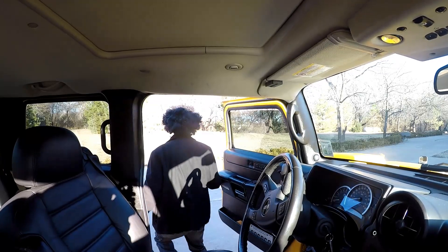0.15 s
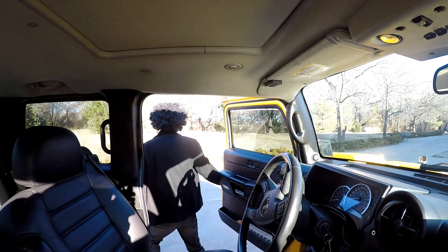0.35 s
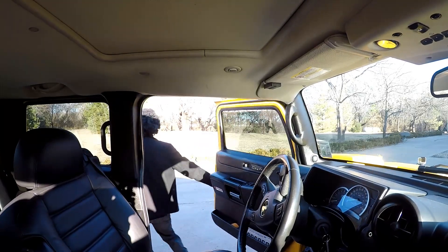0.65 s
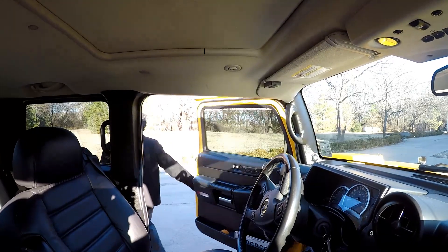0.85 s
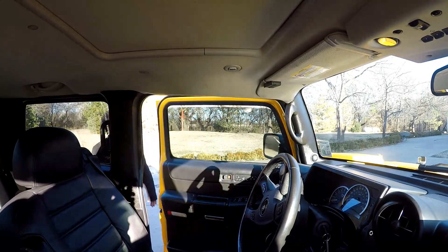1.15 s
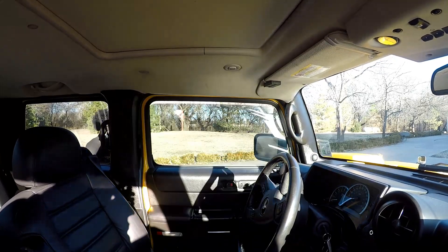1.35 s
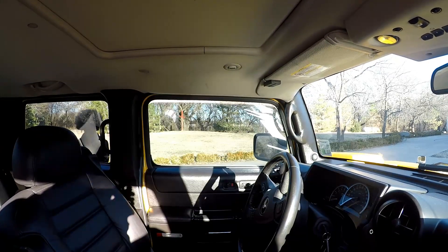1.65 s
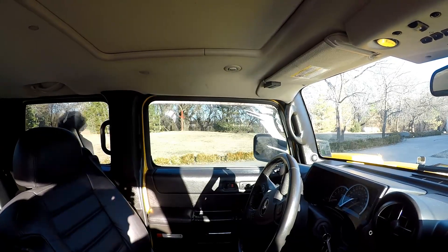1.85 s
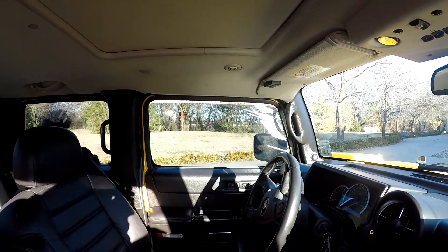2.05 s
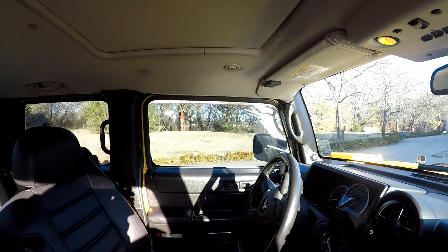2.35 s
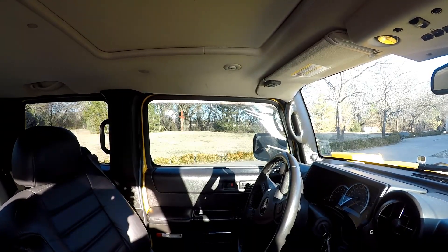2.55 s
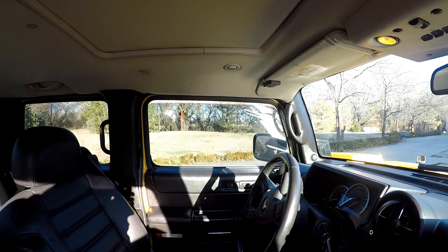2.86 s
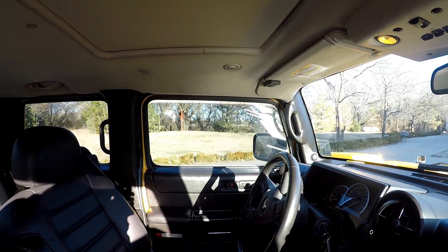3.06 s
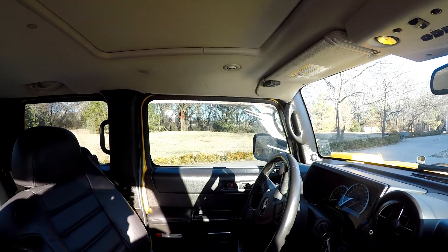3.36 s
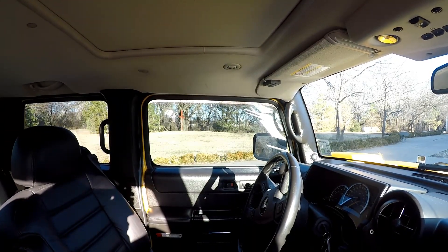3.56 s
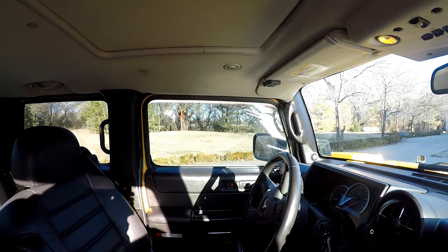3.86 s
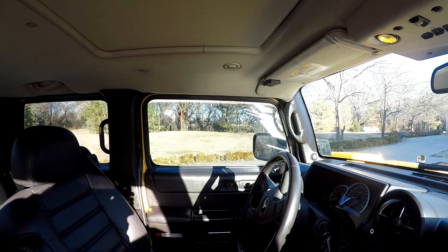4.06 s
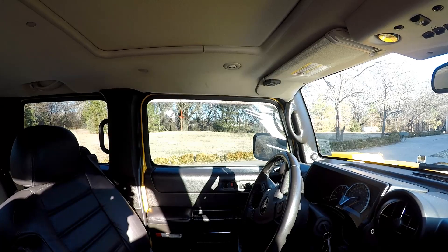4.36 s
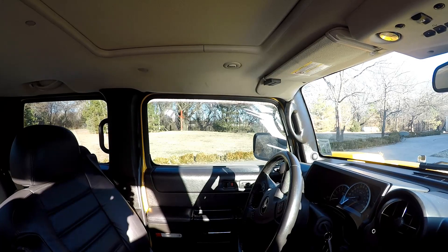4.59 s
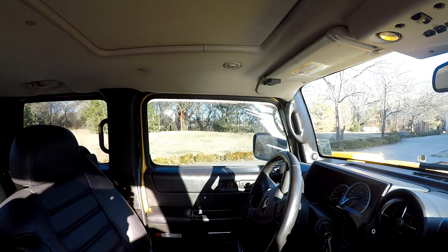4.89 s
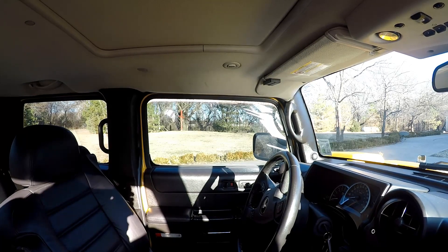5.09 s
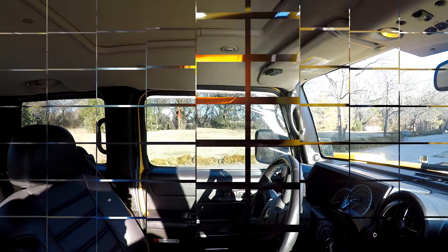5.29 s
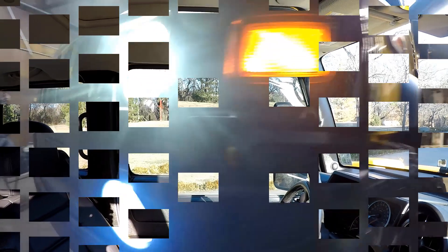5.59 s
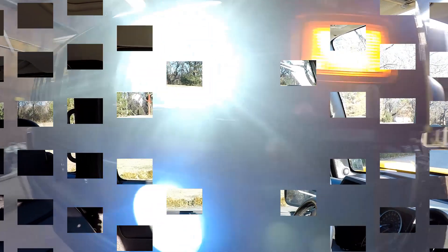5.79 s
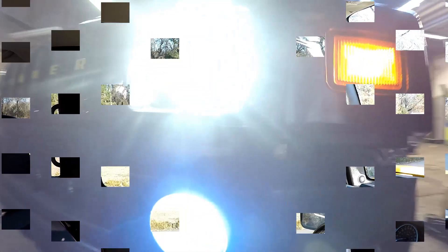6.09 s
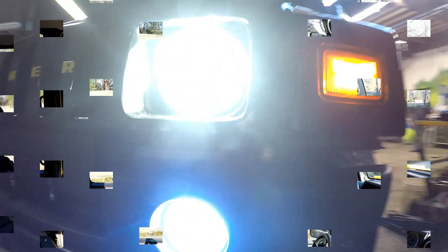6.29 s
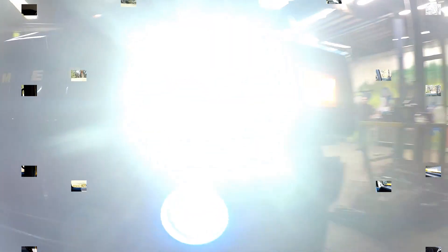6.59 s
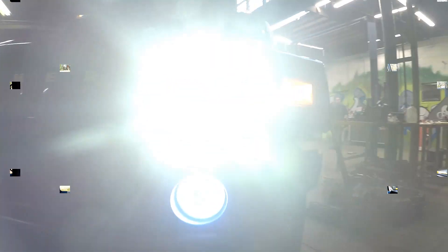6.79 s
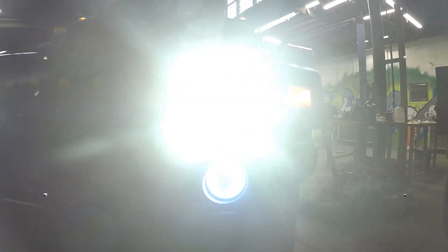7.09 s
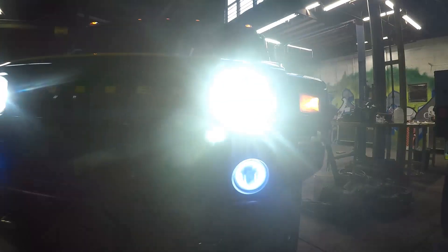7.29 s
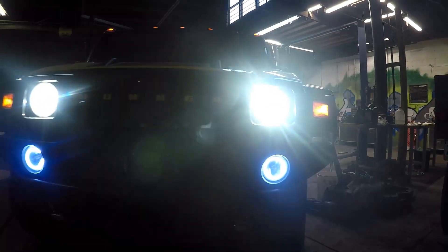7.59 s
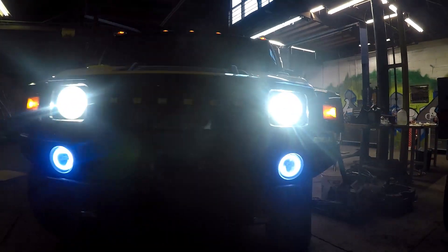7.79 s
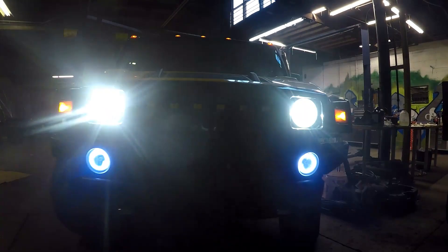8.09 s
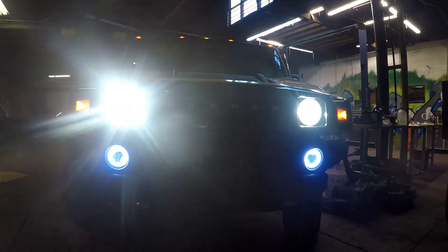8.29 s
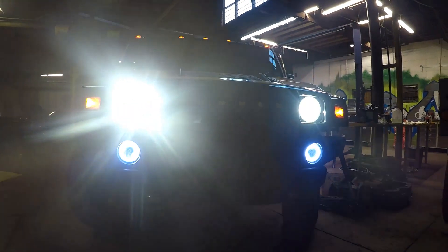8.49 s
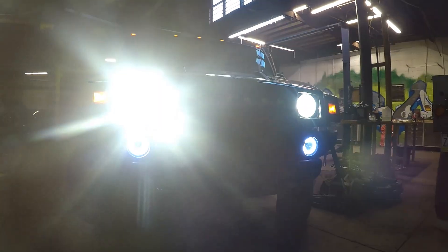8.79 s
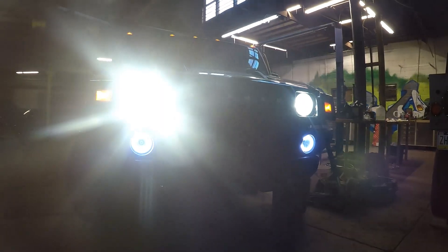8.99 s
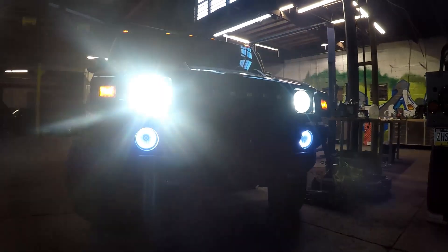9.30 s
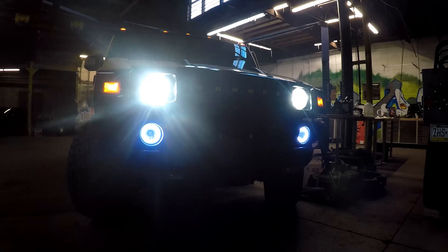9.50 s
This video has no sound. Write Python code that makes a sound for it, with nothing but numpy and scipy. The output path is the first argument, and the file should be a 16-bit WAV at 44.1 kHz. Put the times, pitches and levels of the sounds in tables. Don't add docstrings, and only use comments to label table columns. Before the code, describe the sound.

Boxy, slightly muffled sound from a microphone in a closed housing. From 0 s, a parked cab with its door open: low wind buffeting, faint cloth rustle, a sharp trim click and dull knock at about 0.15 s, and smaller ticks and a soft bump near 1.05 s. At 1.52 s the door seal brushes, then latch and heavy slam land by 1.6 s, with rattling rebounds until 1.75 s, a low panel ring and slow sub-bass air pulse. The level then ducks sharply; quiet wind and hiss creep back, with a gust near 3.95 s and a soft low thud at 4.83 s. From 6.3 to 7.6 s it crossfades to a reverberant workshop: a large diesel idling steadily, about 46 firings per second, with deep hum, exhaust rumble and metallic clatter. Two small clicks come near 7.4 s. While walking past, the deep hum weakens and its octave strengthens by 8.6 s, continuing to the end.

```python
import sys
import numpy as np
from scipy import signal
from scipy.fft import rfft, irfft, next_fast_len
from scipy.io import wavfile

SR = 44100
rng = np.random.default_rng(int(sys.argv[2]) if len(sys.argv) > 2 else 0)


def voltage_ratio(decibels):
    exponent = np.asarray(decibels, float) / 20
    return 10 ** exponent


def dump_mix(stems):
    frames = np.atleast_2d(stems).T
    limited = np.clip(frames, -1, 1)
    pcm = np.round(limited * 32767).astype(np.int16)
    wavfile.write(sys.argv[1], SR, pcm)


N = 425565
HISS_DB = -67


# time in seconds, place (0 firing tone peaks, 1 its octave peaks).
WALK = [(6.4, 1.2), (6.55, 1), (6.75, .15), (6.9, 0), (7.45, .25), (7.9, .7), (8.2, .87), (8.6, 1),
        (9.65, 1)]
# time in seconds, firings per second.
IDLE_SPEED = [(6.3, 46.45), (7.65, 46.5), (7.85, 45.95), (8.3, 45.8), (8.7, 45.55), (9.65, 45.55)]


def engine():
    place, = in_time(WALK)
    tone_db = -15 - 10.5 * place ** 3
    octave_db = -25 + 11.5 * place
    rumble_db = -21.5 - 2 * place + 2.5 * np.sin(np.pi * place)
    clatter_db = -28
    firings = np.cumsum(in_time(IDLE_SPEED)[0]) / SR
    strength = firing_strength(firings)
    layers = np.sqrt(2) * crank_tones(firings, tone_db, octave_db, clatter_db)
    layers += voltage_ratio(rumble_db + 3.5) * exhaust_rumble(firings, strength)
    layers += voltage_ratio(clatter_db + 1.5) * block_clatter(firings, strength)
    return layers * crossfade()


CYLINDER_DB = [1.2, -.9, .6, -1.1, .9, -1.2, .5, -.3]


def firing_strength(firings):
    number, phase = firings.astype(int), firings % 1
    chance_db = 0.13 * rng.standard_normal(number[-1] + 1)
    return voltage_ratio(np.array(CYLINDER_DB)[number % 8] + chance_db[number]) * np.clip(phase * 9, 0, 1)


# frequency in Hz, width in Hz, gain in dB.
BLOCK_MODES = [(926, 45, 5.5), (1420, 600, 2), (2132, 410, 6.5), (2713, 340, 7), (4800, 500, 6.5)]
# frequency in Hz, density in dB per Hz.
CLATTER_SPECTRUM = [(280, -24), (480, -5.5), (539, -9.5), (950, -15), (1130, -8), (1580, -1.5),
                    (2370, -12.5), (2700, -13), (3560, -8), (4760, -19), (6100, -22), (7800, -37),
                    (12800, -52.5), (15400, -53.5)]


def block_clatter(firings, strength):
    knock = strength * np.exp(-(firings % 1) * 3.6) + 0.54
    knocks = knock * cycle_locked(firings, lasting_s=0.6, share=0.3)
    knocks = uneven_parts(knocks, firings.astype(int), spread_db=1.4)
    return colour(peaks(workshop(knocks, t60=1.0, wet_db=-1.5), BLOCK_MODES), CLATTER_SPECTRUM)


# low edge in Hz, top edge in Hz.
BLOCK_PARTS_HZ = [(300, 1250), (1250, 2250), (2250, 3600), (3600, 16000)]


def uneven_parts(x, number, spread_db):
    draws = voltage_ratio(spread_db * rng.standard_normal((number[-1] + 1, len(BLOCK_PARTS_HZ))))
    out = np.zeros(N)
    for k, edges in enumerate(BLOCK_PARTS_HZ):
        band = signal.butter(2, edges, "band", fs=SR, output="sos")
        out += signal.sosfilt(band, x * draws[number, k])
    return out


# frequency in Hz, density in dB per Hz.
RUMBLE_SPECTRUM = [(3, -14.5), (12, -15), (28, -22), (45, -10), (65, 3.5), (78, -1.5), (105, -0.5),
                   (125, -3), (150, -2), (195, -5), (250, -10), (320, -13.5), (400, -17), (520, -40),
                   (700, -57)]


def exhaust_rumble(firings, strength):
    exhaust = cycle_locked(firings, lasting_s=0.7, share=0.65) * voltage_ratio(0.8 * drift(8))
    exhaust *= strength * np.exp(-(firings % 1) * 6.6) + 0.5
    return colour(workshop(exhaust, t60=0.68, wet_db=-5.5), RUMBLE_SPECTRUM)


# multiple of firing rate, level in dB over clatter or octave.
ORDERS_WITH_CLATTER = [(.5, -14), (.75, -2), (1.5, -9), (1.75, -4)]
ORDERS_WITH_OCTAVE = [(1.125, -21), (1.25, -12), (2.25, -16), (2.5, -19), (3, -19), (3.75, -21), (4, -19),
                      (4.5, -24), (7, -27)]


def crank_tones(firings, tone_db, octave_db, clatter_db):
    tones = voltage_ratio(tone_db) * np.cos(2 * np.pi * firings)
    tones -= voltage_ratio(octave_db + 0.7 * drift(3)) * np.cos(4 * np.pi * firings)
    for level_db, orders in ((clatter_db, ORDERS_WITH_CLATTER), (octave_db, ORDERS_WITH_OCTAVE)):
        for multiple, db in orders:
            level = voltage_ratio(level_db + db + 0.63 * drift(1))
            tones += level * np.cos(2 * np.pi * multiple * firings + 0.5 * drift(0.42))
    return tones


def cycle_locked(firings, lasting_s, share):
    walk = np.arange(N) / SR / lasting_s
    step, blend = walk.astype(int), walk % 1 * np.pi / 2
    patterns = rng.standard_normal((40, 8192))
    at = (firings / 8 % 1 * 8192).astype(int)
    repeating = np.cos(blend) * patterns[step % 40, at]
    repeating += np.sin(blend) * patterns[(step + 1) % 40, at]
    return np.sqrt(share) * repeating + np.sqrt(1 - share) * rng.standard_normal(N)


def workshop(x, t60, wet_db):
    t = np.arange(SR) / SR
    tail = rng.standard_normal(SR) * voltage_ratio(-60 * t / t60) * (t > 0.012)
    return x + voltage_ratio(wet_db) * signal.fftconvolve(x, tail / np.sqrt(np.sum(tail ** 2)))[:N]


# start in seconds, peak in dB, top frequency in Hz, t60 in seconds.
SLAM = [
    (1.519, -24, 6960, 0.38),
    (1.557, -8.5, 4650, 0.063),
    (1.59, -23.5, 3000, 0.094),
    (1.596, -6, 3000, 0.075),
    (1.631, -10, 7460, 0.11),
    (1.652, -22, 7500, 0.097),
    (1.678, -15.5, 7000, 0.039),
    (1.699, -16, 7960, 0.056),
    (1.718, -19.5, 7000, 0.16),
    (1.74, -24.5, 6940, 0.063),
]
# frequency in Hz, density in dB per Hz.
DOOR_SPECTRUM = [(210, -28), (350, 1.5), (410, -9.5), (554, -11), (681, -8.5), (950, -9), (1130, -19),
                 (1460, -9), (2000, -7.5), (2580, -17.5), (3120, -10.5), (3430, -13), (5870, -10.5),
                 (15400, -33)]


def door():
    clumps_db = 2.0 * rng.exponential(1, N).clip(0, 5)
    grit = colour(rng.standard_normal(N) * voltage_ratio(clumps_db), DOOR_SPECTRUM)
    contacts = np.zeros(N)
    for s, db, top_hz, t60 in SLAM:
        contacts += burst(grit, s, db - 27, 6000, 17000, 0.065)
        contacts += burst(grit, s, db - 9.5, 300, top_hz, t60)
    dull = signal.sosfilt(signal.butter(4, 7600, fs=SR, output="sos"), grit)
    shake = dull * rattling() * voltage_ratio(2.2 * drift(70))
    return contacts + shake + door_panel() + 1.01 * cab_boom()


# frequency in Hz, level in dB, t60 in seconds.
PANEL_MODES = [(63.5, -3.5, 0.82), (132, 0.5, 0.29), (173.5, -7, 0.31), (244, 5, .14), (286, 1.5, 0.21),
               (403.3, -7.5, 0.12), (767, -5, 0.076), (1290, -10, .1), (1500, -7, 0.11), (2250, -11.5, .07)]


def door_panel():
    latch_s, slam_s = SLAM[1][0], SLAM[2][0]
    blows = 0.15 * click(latch_s) + 0.5 * click(slam_s)
    blows += 0.31 * click(slam_s + 0.1) - click(slam_s + 0.008)
    return sum(voltage_ratio(db - 16.0) * ring(blows, hz, t60) for hz, db, t60 in PANEL_MODES)


# frequency in Hz, t60 in seconds, push at latch, at slam, at rebound (linear).
AIR_MODES = [(12.2, 1.25, -0.63, -0.47, -0.25), (16.0, 1.36, 0.59, 0.11, 0.21),
             (20.1, 1.69, -0.39, 0.29, -0.08), (26.0, 0.68, 0.16, -0.64, -0.07)]
PUSH_S = [1.554, 1.5995, 1.654]


def cab_boom():
    boom = np.zeros(N)
    for hz, t60, *pushes in AIR_MODES:
        boom += ring(sum(push * click(s) for push, s in zip(pushes, PUSH_S)), hz, t60)
    return boom


def rattling():
    from_s, until_s, settled_s = 1.55, 1.73, 1.88
    stop_db_per_s = 500
    t = np.arange(N) / SR
    buzz = voltage_ratio(-29 - stop_db_per_s * np.clip(t - until_s, 0, 1)) + voltage_ratio(-61)
    flare = voltage_ratio(-23.5) * swell(1.625, rise_s=0.016, t60=0.4) * (t < until_s)
    return (buzz + flare) * np.clip(np.minimum(t - from_s, settled_s - t) * 50, 0, 1)


# frequency in Hz, width in Hz, gain in dB.
TRIM_MODES = [(253, 210, -1), (796, 120, 9), (1450, 190, 3), (1930, 90, 19.5), (2720, 130, 6),
              (3520, 110, -3)]
# start in seconds, peak in dB, low Hz, top Hz, t60 in seconds.
TICKS = [(0.14, -24, 1990, 3970, 0.046), (0.1512, -10.5, 605, 4050, 0.087), (.192, -34, 500, 5000, .08),
         (0.645, -36, 400, 8000, .06), (.821, -41.5, 900, 2500, 0.072), (1.0545, -26, 1230, 1990, 0.031),
         (1.057, -24, 400, 1980, 0.17), (1.066, -45, 3320, 9000, 0.09), (1.175, -41, 900, 2400, .2),
         (1.849, -39.5, 810, 6420, 0.121), (2.267, -53.5, 995, 3045, 0.11), (2.298, -54, 1004, 4500, 0.091),
         (3.024, -47, 4800, 7260, 0.11), (6.083, -51, 700, 2500, .08), (7.352, -20, 1300, 2100, .04),
         (7.458, -21, 1310, 2800, .05)]


def small_ticks():
    trim = peaks(rng.standard_normal(N), TRIM_MODES)
    return sum(burst(trim, s, db - 11.5, low_hz, top_hz, t60) for s, db, low_hz, top_hz, t60 in TICKS)


# start in seconds, peak in dB, ring in Hz, t60 in seconds.
BUMPS = [(0.154, -18, 273, 0.04), (.194, -15.5, 122, 0.026), (1.007, -24, 97, 0.18),
         (1.058, -18, 117.4, 0.42), (1.059, -28.5, 320, 0.14), (1.248, -30.5, 274, 0.079),
         (4.817, -25, 197.8, 0.35), (4.82, -43, 335, 0.36), (4.836, -17, 69.3, 0.33),
         (4.844, -31, 150, 0.13), (4.862, -30, 103, .25)]


def body_bumps():
    bumps = np.zeros(N)
    for s, db, hz, t60 in BUMPS:
        answer = ring(click(s + 0.00608), hz * 1.4, t60 * 0.75)
        bumps += voltage_ratio(db) * (ring(click(s), hz, t60) - 0.42 * answer)
    return signal.sosfilt(signal.butter(2, 500, fs=SR, output="sos"), bumps)


# time in seconds, level in dB.
WIND = [(0, -25.5), (.5, -30), (.7, -33), (.85, -36), (1.1, -33.5), (1.32, -30), (1.55, -27), (2.1, -26),
        (2.35, -34), (3.25, -39.5), (3.75, -36.5), (3.95, -27.5), (4.1, -35.5), (4.33, -35.5), (4.55, -35),
        (4.72, -38), (4.98, -35), (6.1, -50.5)]
# frequency in Hz, density in dB per Hz.
BUFFET_SPECTRUM = [(6, -20.5), (14, 5.5), (30, -2), (55, -8.5), (80, -39)]
THRUM_SPECTRUM = [(35, -35), (50, 0.5), (65, -0.5), (110, -4), (135, -11), (180, -36.5)]
OUTDOORS_SPECTRUM = [(74, -33.5), (125, -3.5), (150, -2.5), (193, -1), (242, -9), (393, -15), (487, -25.5),
                     (520, -19.5), (680, -61), (1140, -120)]
CAB_AIR_SPECTRUM = [(260, -28.5), (450, -2), (545, -13), (725, 0), (944, -8), (972, -9.5), (1050, -13),
                    (1640, -6), (2600, -17), (3380, -37), (5720, -120)]


def cab():
    wind_db, = in_time(WIND)
    over_calm_db = wind_db + 37
    is_open = door_open()
    shudder = swell(1.63, rise_s=0.04, t60=0.6)
    lumps = drift(1.4)
    wind = voltage_ratio(wind_db + 1.3 * drift(4.6)) * noise(BUFFET_SPECTRUM)
    thrum = voltage_ratio(-41.5 + 4 * is_open + 0.6 * over_calm_db + 2.0 * lumps) + voltage_ratio(-24) * shudder
    thrum = thrum * noise(THRUM_SPECTRUM)
    outdoors = voltage_ratio(-45.5 + 0.1 * over_calm_db + 1.1 * lumps) + voltage_ratio(-25.5) * shudder
    outdoors = outdoors * noise(OUTDOORS_SPECTRUM)
    air = voltage_ratio(HISS_DB + 9.0) * noise(CAB_AIR_SPECTRUM)
    return (wind + thrum + outdoors + air + cloth_rustle(is_open)) * recorder_gain()


# peak time in seconds, level in dB.
SWISHES = [
    (.158, -43),
    (.238, -52.5),
    (.65, -67),
    (1.068, -58),
]
# frequency in Hz, density in dB per Hz.
RUSTLE_SPECTRUM = [(1500, 0.5), (2600, -6), (5500, -4), (7000, -9), (9500, -37)]


def cloth_rustle(is_open):
    sinks_db_per_s = 1.5
    cloth = voltage_ratio(-57 - sinks_db_per_s * np.arange(N) / SR)
    cloth += sum(voltage_ratio(db) * swell(s, rise_s=0.022, t60=0.12) for s, db in SWISHES)
    return cloth * voltage_ratio(1.7 * drift(12)) * is_open * noise(RUSTLE_SPECTRUM)


def door_open():
    return np.clip((SLAM[0][0] - np.arange(N) / SR) * 50, 0, 1)


def recorder_gain():
    duck_s, duck_db, attack_s, hold_s, recover_db_per_s = 1.776, -16.5, 0.18, 0.31, 12.5
    t = np.arange(N) / SR - duck_s
    down = duck_db * np.clip(t / attack_s, 0, 1)
    back = recover_db_per_s * np.clip(t - attack_s - hold_s, 0, None)
    cab_share = (1 - crossfade()) ** 0.13
    return voltage_ratio(np.minimum(down + back, 0)) * cab_share


def crossfade():
    start_s, length_s, bend = 6.337, 1.286, 1.22
    return np.clip((np.arange(N) / SR - start_s) / length_s, 0, 1) ** bend


# frequency in Hz, density in dB per Hz.
HISS_SPECTRUM = [(1290, -35.5), (2200, -4.5), (3230, -1), (6200, 2), (7180, -2), (9700, 0.5), (13800, -13),
                 (15400, -23.5)]
# frequency in Hz, level in dB over hiss.
WHINE = [(1000, -5), (2000, -15.5), (6000, -22), (8000, -27.5)]


def preamp_noise():
    t = np.arange(N) / SR
    whine = sum(voltage_ratio(db) * np.sin(2 * np.pi * hz * t) for hz, db in WHINE)
    return voltage_ratio(HISS_DB) * recorder_gain() * (voltage_ratio(4.5) * noise(HISS_SPECTRUM) + voltage_ratio(9.0) * whine)


def rms_one(x):
    return x / np.sqrt(np.mean(x ** 2) + 1e-20)


def in_time(rows):
    s, *columns = np.transpose(rows)
    return [np.interp(np.arange(N) / SR, s, c) for c in columns]


def colour(x, spectrum):
    size, (hz, db) = next_fast_len(N), np.transpose(spectrum)
    log_hz = np.log(np.arange(size // 2 + 1) * SR / size + 1e-3)
    gain = voltage_ratio(np.interp(log_hz, np.log(hz), db, left=-120, right=-120))
    return rms_one(irfft(rfft(x, size) * gain, size)[:N])


def noise(spectrum):
    return colour(rng.standard_normal(N), spectrum)


def drift(rate_hz):
    r = np.exp(-80 * np.pi * rate_hz / SR)
    slow = signal.lfilter([1], [1, -2 * r, r * r], rng.standard_normal(N // 40 + 2002))[2000:]
    return np.interp(np.arange(N) / 40, np.arange(len(slow)), rms_one(slow))


def peaks(x, modes):
    for hz, width_hz, db in modes:
        a, w = voltage_ratio(db / 2), 2 * np.pi * hz / SR
        k = np.pi * width_hz / SR
        middle = -2 * np.cos(w)
        x = signal.lfilter([1 + k * a, middle, 1 - k * a], [1 + k / a, middle, 1 - k / a], x)
    return x


def ring(clicks, hz, t60):
    r, w = voltage_ratio(-60 / (t60 * SR)), 2 * np.pi * hz / SR
    return signal.lfilter([0, np.sin(w)], [1, -2 * r * np.cos(w), r * r], clicks + 1e-18)


def click(s):
    return 1.0 * (np.arange(N) == round(s * SR))


def dying(t60):
    t = np.arange(14000) / SR
    return np.clip(t * 650, 0, 1) * np.exp(-np.log(1000) * t / t60)


def burst(source, s, db, low_hz, top_hz, t60):
    start = round(s * SR)
    out, near = np.zeros(N), slice(start, start + 14000)
    band = signal.butter(3, [low_hz, top_hz], "band", fs=SR, output="sos")
    level = np.std(signal.sosfilt(band, source[near]))
    out[near] = voltage_ratio(db) / level * signal.sosfilt(band, source[near] * dying(t60))
    return out


def swell(s, rise_s, t60):
    t = np.arange(N) / SR - s
    return np.clip(1 + t / rise_s, 0, 1) * voltage_ratio(-60 * np.clip(t, 0, 3) / t60)


def scene():
    return (engine() + door() + small_ticks() + body_bumps() + cab())[None]


def low_pass(x):
    return signal.sosfilt(signal.butter(12, 15590, fs=SR, output="sos"), x)


# frequency in Hz, width in Hz, gain in dB.
HOUSING_NOTCHES = [(548.6, 88, -11), (1094, 85, -5.5), (1895, 81, -6), (2328, 180, -2)]


def record(dry):
    mix = peaks(dry, HOUSING_NOTCHES) + preamp_noise()
    return low_pass(np.clip(mix, -1, 1))


dry = scene()
out = record(dry)
dump_mix(out)
```